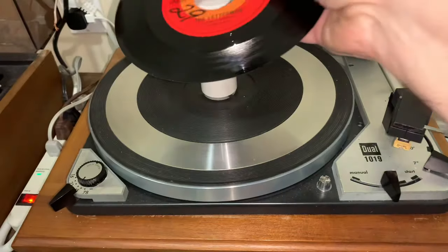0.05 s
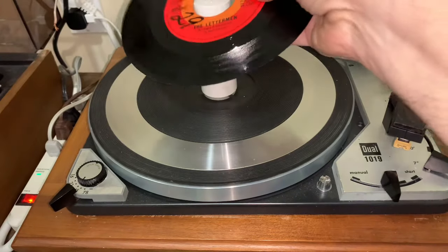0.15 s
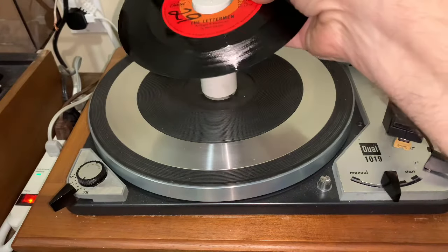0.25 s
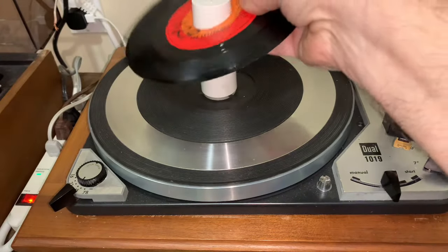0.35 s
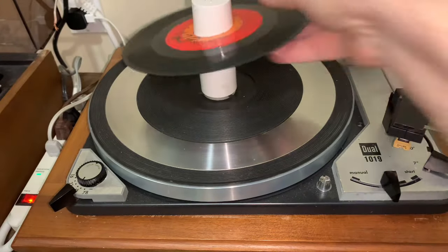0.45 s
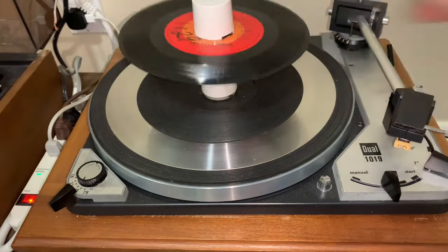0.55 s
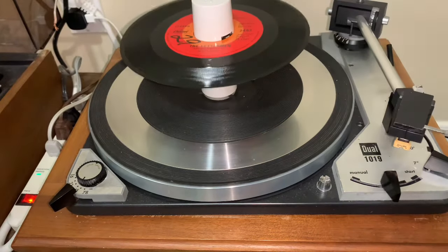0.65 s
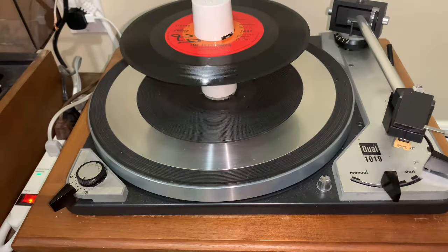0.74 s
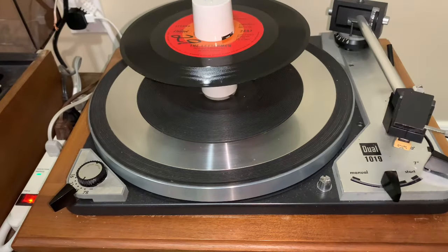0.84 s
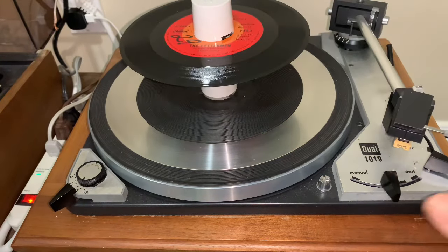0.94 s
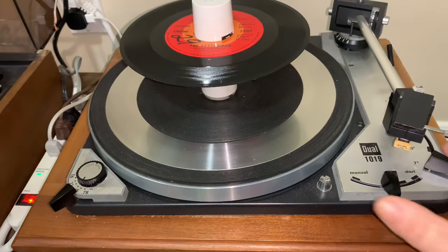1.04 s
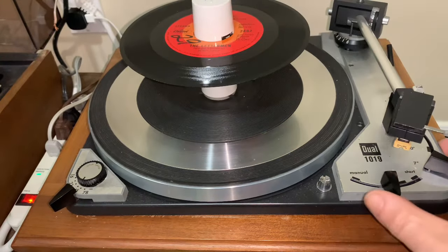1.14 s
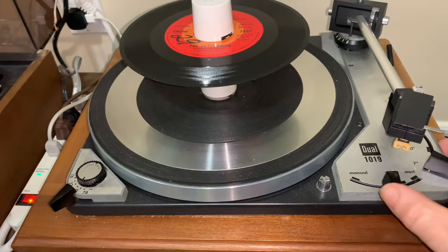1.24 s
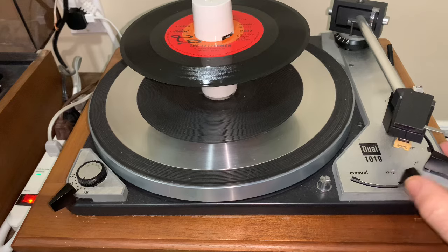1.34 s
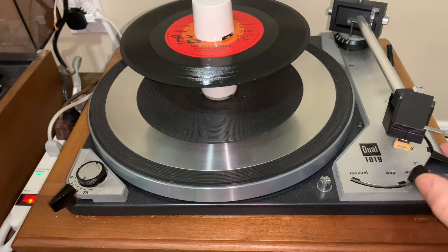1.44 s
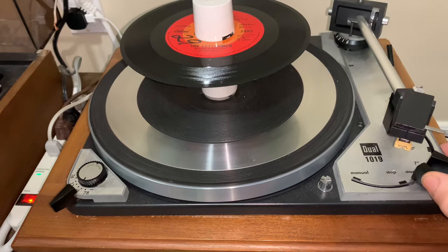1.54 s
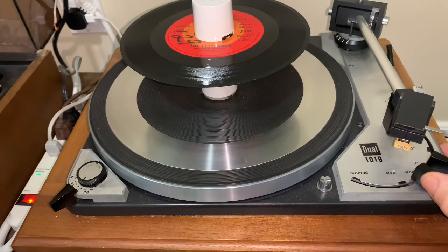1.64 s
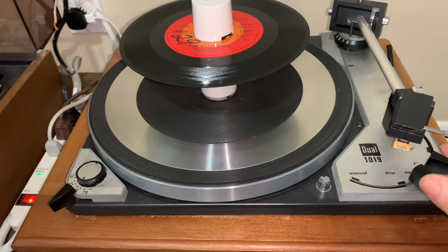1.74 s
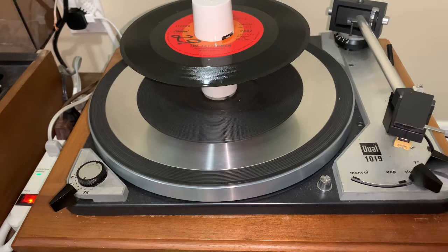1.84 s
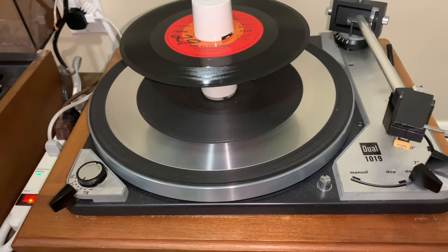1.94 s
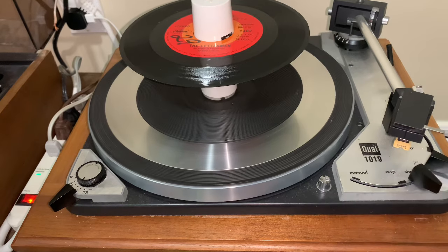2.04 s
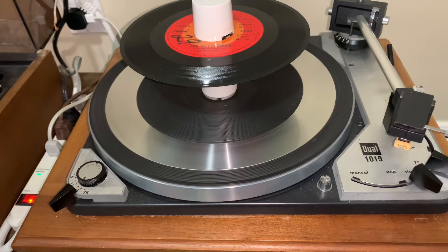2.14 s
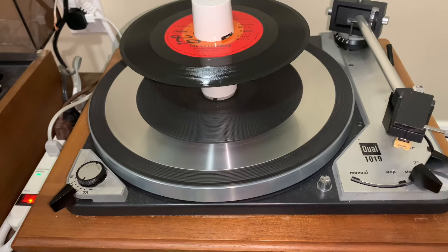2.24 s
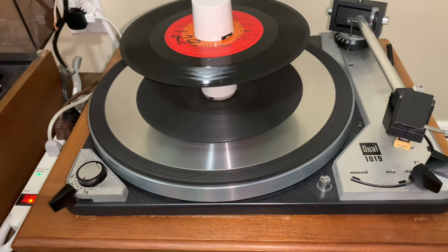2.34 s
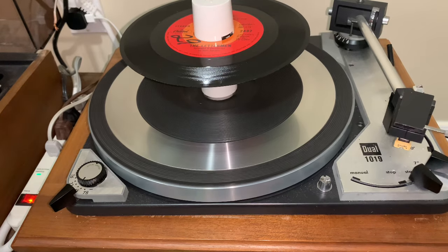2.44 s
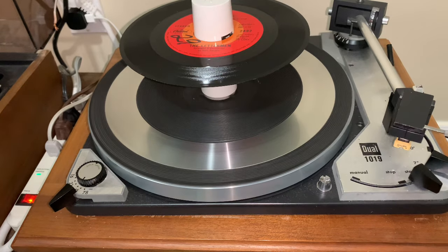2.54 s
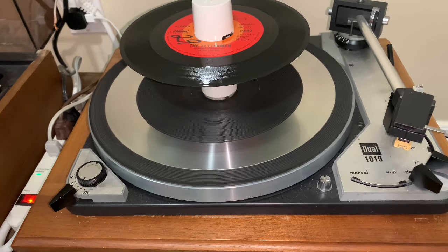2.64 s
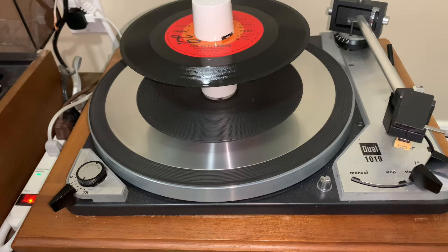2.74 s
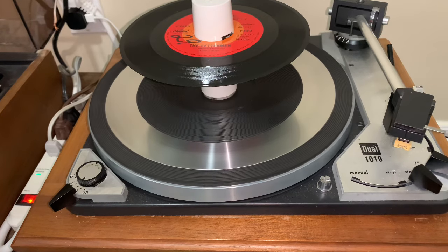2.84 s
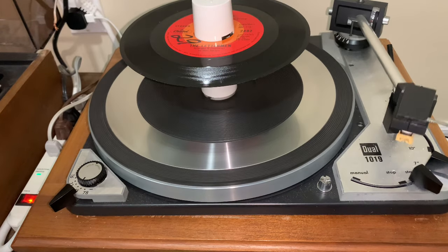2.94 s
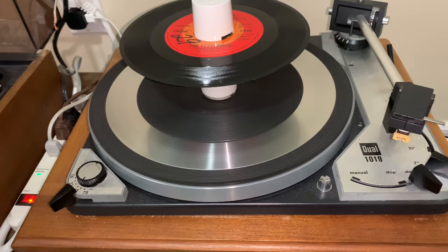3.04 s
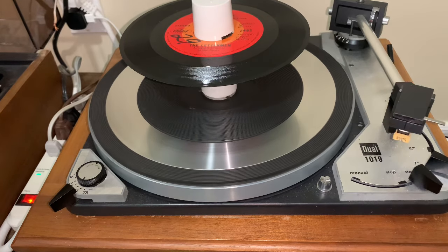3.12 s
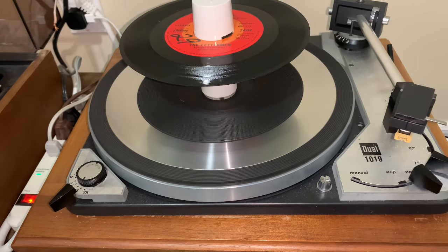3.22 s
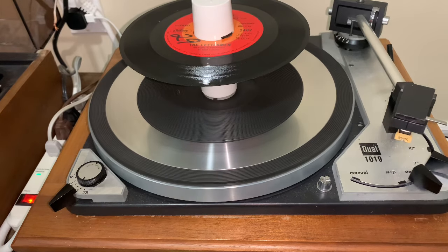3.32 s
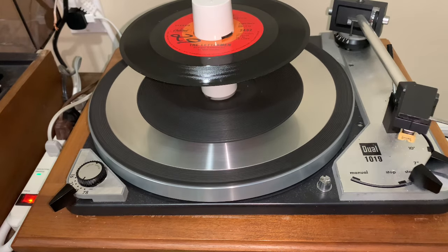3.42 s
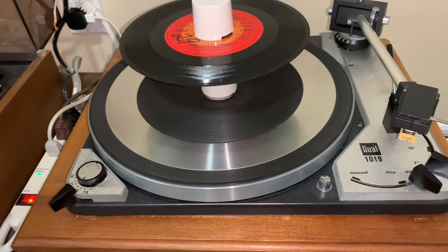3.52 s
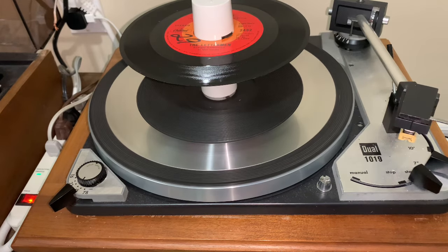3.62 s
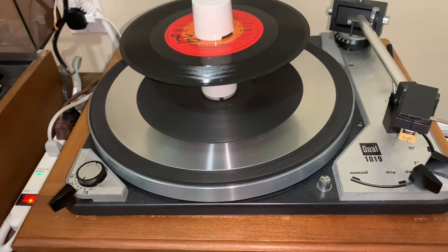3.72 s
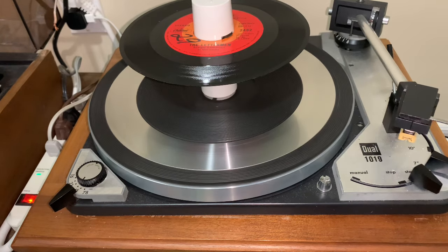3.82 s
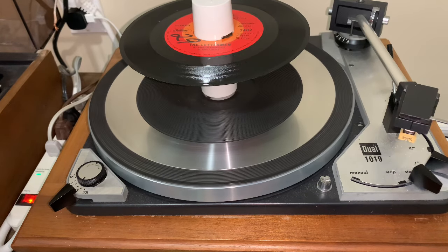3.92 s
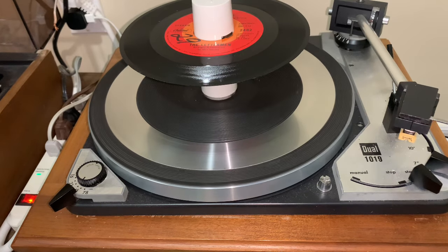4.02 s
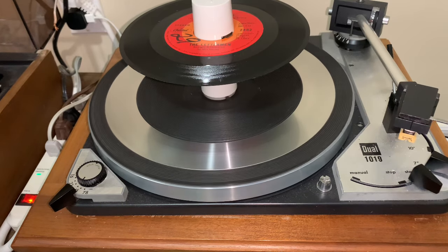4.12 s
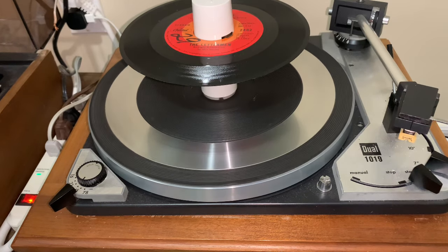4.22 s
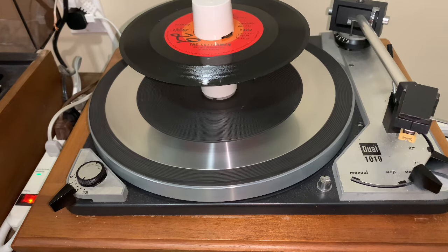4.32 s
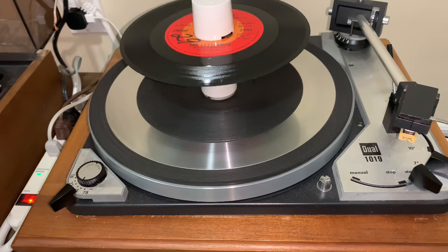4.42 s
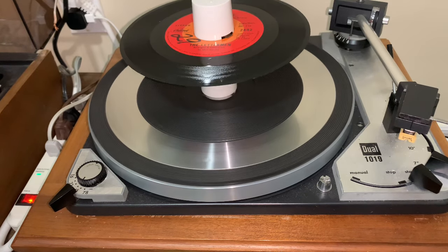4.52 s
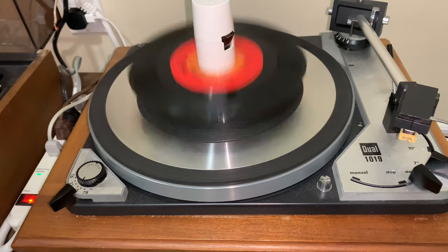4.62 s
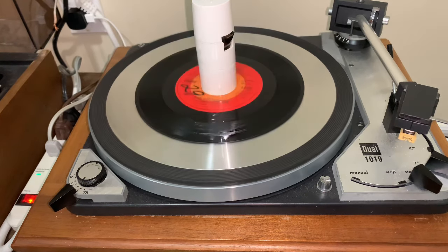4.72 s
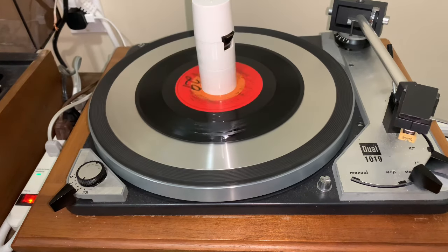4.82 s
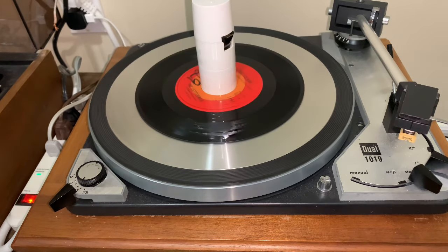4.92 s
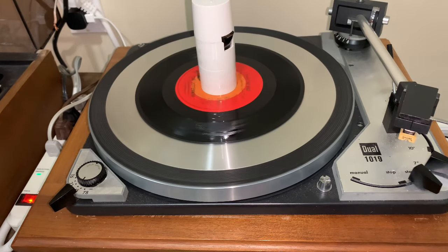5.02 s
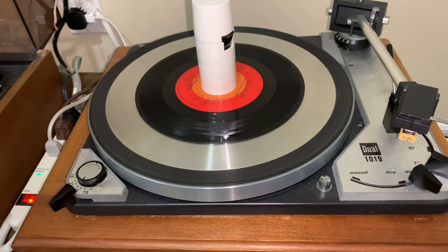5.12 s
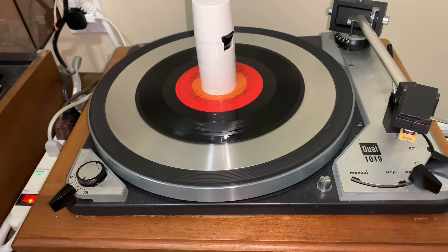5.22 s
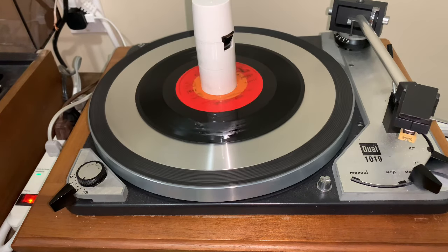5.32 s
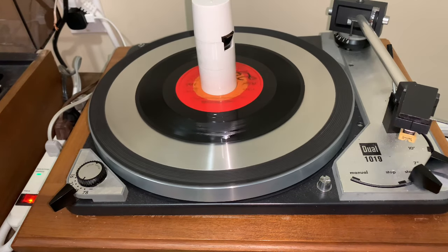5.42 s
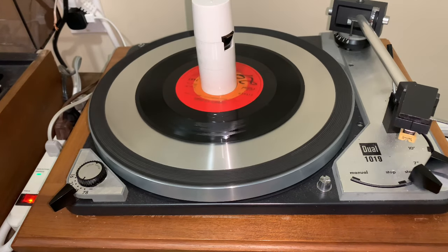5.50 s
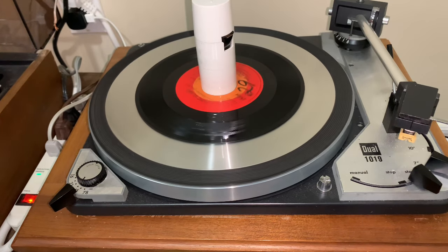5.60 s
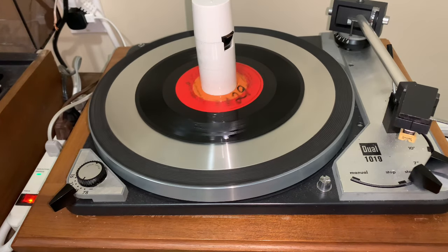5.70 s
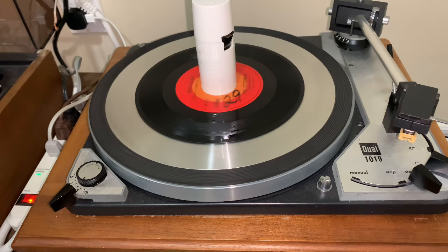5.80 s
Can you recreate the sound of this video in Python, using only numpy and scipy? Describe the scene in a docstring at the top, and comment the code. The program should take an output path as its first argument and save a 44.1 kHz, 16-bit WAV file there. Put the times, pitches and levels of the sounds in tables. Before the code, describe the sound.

Close stereo phone pickup in a small live room: a vinyl single scrapes and taps onto a wide spindle, then a start lever clacks hard twice with a lesser clack after. Faint irregular ticks and sliding follow, a long near-quiet, then a sharp click, a loud snap and the flat slap of the record landing with a soft thud. Low rumble and faint hiss throughout.

```python
"""Single dropped by a record changer

A vinyl single knocks its way onto the wide spindle of a record changer and the start lever is thrown.
The cam turns with faint ticks, sliding and rasping; the claws snap in, the single slides off and slaps down.
Blows are bursts of noise ringing part resonances, slides are swelling noise, pings and thud are damped sines.
A phone close by hears it in a small live room, over a low rumble with two drones and a faint hiss."""
import sys
import numpy as np
from scipy import signal
from scipy.fft import rfft, irfft, next_fast_len
from scipy.io import wavfile

SR = 44100
rng = np.random.default_rng(int(sys.argv[2]) if len(sys.argv) > 2 else 0)


def log_audio(samples):
    """Write samples as a 16-bit WAV file to the path given in sys.argv[1]."""
    # one column per channel
    frames = np.atleast_2d(samples).T
    # limit to full scale, then quantise
    limited = np.clip(frames, -1, 1)
    pcm = np.round(limited * 32767).astype(np.int16)
    wavfile.write(sys.argv[1], SR, pcm)


N = 258413
TIME = np.arange(N) / SR
RING = TIME[:SR // 3]  # seconds since a blow, as long as one may ring

# Blows: [start_s, level_db over 10 ms, chatter_ms, bass_db, presence_db, treble_db]
# the single knocking on the spindle
KNOCKS = [(.155, -42, 1.63, 18, 0, -5.5), (.187, -41, 1.66, 19, -2.5, -8.5),
          (.274, -46.5, 9.7, 18, -11.5, -7), (.301, -46, 8, 10.5, -16.5, -8),
          (.349, -47, 1.37, -11, -12, -1.5), (.467, -43.5, 5.8, 11.5, 3, 5),
          (.529, -36, 2.6, -4.5, -5, -2.5), (.575, -46.5, 3.7, 12.5, -7, -7.5),
          (.589, -35, 4.24, 6.5, 3, 1), (.619, -45.5, 2.84, -6, -13, -18)]
# pawls tripped by the turning cam
TICKS = [(2.3645, -41.5, 3.4, 14, 8, 5.5), (2.634, -51, 3.05, 17.5, -28.5, -31.5),
         (2.6755, -45.5, 2.46, -7.5, 6.5, 1.5), (2.761, -57, 2.1, -0.5, -19, -24),
         (2.936, -48.5, 5.44, -4.5, -1.5, -16.5), (4.146, -68, 4.11, -5.5, 6, 10),
         (4.265, -62.5, 4.96, -7, 7, -6.5), (4.328, -47, 9.9, -7.5, -5.5, -18.5),
         (4.9425, -38.5, 6.28, -5.5, -5.5, -5.5), (5.623, -63, 2.88, -6.5, -8, -4.5),
         (5.795, -49, 7.3, -1, -40, -37.5)]
# the claws taking the weight of the single
CATCHES = [(4.3542, -27, 0.97, 0.5, 3.5, 8), (4.3595, -28.5, 3.1, -4, -1.5, -4.5)]
# the claws snapping into the spindle, then the single sliding off it
SNAPS = [(4.540, -48.5, 6.7, -5, 9, -15.5), (4.549, -40.5, 7.4, -7, 15.5, -11.5),
         (4.555, -24.5, 8.65, 5.5, -3.5, 3), (4.5592, -17.5, 2.43, 2.5, 3, 1.5),
         (4.569, -29.5, 7.6, 13, -5, -19), (4.660, -39, 5.2, -6.5, 19.5, -16.5)]
# the single landing flat on the platter
SLAPS = [(4.6712, -28.5, 1.11, 4, 3.5, 4), (4.6762, -27.5, 3.5, -8, 11.5, -12.5),
         (4.6785, -23, 0.346, 7, 1.5, 5.5), (4.684, -33, 0.87, 1, -0.5, 2.5),
         (4.6895, -28.5, 2.6, -14.5, -2, -10.5), (4.6945, -32.5, 3.6, -11.5, 0, -4.5),
         (4.703, -51.5, 3.3, -2.5, -16, 4.5)]
# throws of the start lever and its linkage: the blow columns, then [rebound_after_ms, rebound_db]
LEVER_THROWS = [(1.218, -44, 7.8, -8, -4.5, -5, 9, -10), (1.304, -37.5, 6.1, -11.5, -2.5, -1.5, 20, -1.5),
                (1.354, -14.5, 6.12, 2, 0.5, 5.5, 26, -13), (1.465, -19.5, 6.5, 6, 2.5, 6, 12, -3),
                (1.7495, -31.5, 2.86, 8, -5.5, -6.5, 14, -15.5)]

# single notes left ringing by small parts and by the single itself:
# [start_s, pitch_hz, level_db over 10 ms, t60_s]
PINGS = [(.303, 356, -45, 0.057), (1.798, 338.1, -51.5, 0.141), (1.802, 268.5, -50.5, 0.152),
         (2.635, 1311, -55, 0.0545), (2.762, 1050, -62, 0.052), (2.941, 368.6, -56, 0.33),
         (3.382, 1315, -61.5, 0.187), (3.654, 1308, -58, 0.226), (4.356, 378, -43.5, 0.08),
         (4.944, 2145, -61, 0.53)]
# low modes of platter and deck: [pitch_hz, relative_level_db, t60_s]
PLATTER_MODES = [(62, -13, 0.21), (85.2, 0.5, 0.094), (120.8, -1, 0.082), (186.5, 4.5, 0.077),
                 (280, -4, 0.067), (333.6, 1.5, 0.12), (407, -3.5, .08)]

# Resonances of each part: [centre_hz, width_hz, lift_db]
# the single held on the spindle
VINYL_RESONANCES = [(361.6, 98, 3.5), (426.7, 28, 4.5), (482.15, 22, 4.5), (683.7, 50, 14.5),
                    (759, 130, 8.5), (1223, 54, 8), (1296, 170, 6.5), (2580, 220, 10.5), (4526, 180, 5.5),
                    (6617, 570, 6), (9065, 450, 14)]
# the changer's metalwork
CHASSIS_RESONANCES = [(398, 58, 3.7), (392, 42, 9.3), (681.5, 40, 14), (776.5, 41, 12), (1049.5, 70, 8),
                      (1143.1, 140, 6), (1660.4, 110, 8.4), (2047, 170, 5.6), (2384, 120, 5),
                      (2690, 160, 3.3), (3152, 46, 5.8), (3448, 46, 6.1), (3634, 110, 5.5), (5205, 34, 5.2),
                      (6096, 120, 4.4), (9200, 770, 6.8), (11030, 120, 7.3), (14950, 200, 8)]
# the spindle as the claws snap in and the single slides off
SPINDLE_RESONANCES = [(408, 45, 7), (500, 60, 4), (691, 55, 19), (787, 46, 11), (1167, 76, 16),
                      (1277, 90, 7.35), (1684, 190, 17), (2310, 160, 7), (2500, 100, 10), (3450, 250, 6),
                      (3977, 100, 9), (4526, 200, 10), (6510, 220, 8)]
# the claws under load
CLAW_RESONANCES = [(409, 76, 15), (694, 83, 7.5), (1120, 150, 5.5), (1340, 120, 4.5), (1770, 560, 5),
                   (5200, 370, 4.5), (6430, 330, 3), (8870, 910, 12)]
# the single as it lands
LANDING_RESONANCES = [(368, 67, 5), (420, 70, 5.6), (530, 110, 6.4), (734, 30, 4), (884, 65, 10),
                      (1200, 64, 4.4), (2037, 60, 6.7), (2127, 52, 6), (2346, 110, 3.87), (3950, 260, 4.6)]

# Broad colours, as spectral density: [frequency_hz, density_db]
# vinyl against the spindle and claws
VINYL_COLOUR = [(60, -17), (200, 1.5), (400, -0.5), (600, -5), (1300, 3), (2000, -9.5), (3500, -13),
                (6500, -5.5), (11000, -9.5), (16000, -24.5)]
# metal on metal in the lever and cam work
METAL_COLOUR = [(60, -34), (200, -18), (400, -7.5), (700, -2), (1500, 5), (3000, 5), (4500, 4), (6500, 5),
                (10000, 1.5), (13000, -7), (16000, -16.5)]
# the spindle as the claws snap in and the single slides off
SPINDLE_COLOUR = [(60, -42.5), (250, -25.5), (700, -2), (1300, -2), (2400, -1.5), (3200, -0.5),
                  (4300, -1.5), (7000, -5.5), (10500, 0.5), (13000, -12), (16000, -19)]
# the flat slap of the single
SLAP_COLOUR = [(60, -11.5), (400, 1), (650, -4), (1100, 3.5), (1600, -0.5), (2200, 3), (3000, -8.5),
               (4200, -2.5), (7000, -2), (10500, -0.5), (16000, -14.5)]
# the coarse part of dry sliding
SLIDE_COLOUR = [(150, 9.5), (400, -3), (1300, 3.5), (2300, -1), (4500, 1.5), (7000, -7), (9000, -12.5),
                (16000, -43.5)]
# the cam follower in its groove
RASP_COLOUR = [(200, -19), (450, -4), (1000, 2), (1400, 4.5), (2000, -8.5), (4000, -28.5)]
# the household rumble
RUMBLE_COLOUR = [(20, -37), (40, -12.5), (62, 3.5), (85, 1), (140, -2), (200, -8), (280, -17), (400, -23),
                 (800, -52.5), (2000, -60.5)]
# the background hiss
HISS_COLOUR = [(100, 11), (400, 10.5), (700, 7.5), (1200, 3.5), (2500, -1.5), (5000, -4.5), (7000, -6.5),
               (8500, -6), (11000, -4.5), (13500, -12), (16000, -9.5)]
# the fine-grained part of dry sliding
FINE_SLIDE_COLOUR = [(1000, -52.5), (7000, 3.5), (10000, 4), (12500, -2), (16000, -14)]
# the landing thud: little of it reaches below 40 Hz
THUD_COLOUR = [(20, -27), (40, -10), (60, 1.5), (500, -2.5), (1500, -4.0)]
# the room's late tail
TAIL_COLOUR = [(100, -5.5), (500, 9), (1500, 3.5), (4000, 5.5), (7000, -3.0), (10000, -10.5), (16000, -13.5)]

# Sliding strokes
# the single on the spindle: [peak_s, level_db before gain, rise_s, fall_s, fine_part_db against the coarse]
FITTING_STROKES = [(.04, -65, 0.15, .06, -12.5), (.28, -63, 0.103, .08, -21.5), (.37, -65.5, 0.06, .09, 3),
                   (.46, -59, .07, .1, -6), (.58, -62, 0.096, .07, -23)]
# the cam, same columns: [peak_s, level_db before gain, rise_s, fall_s, fine_part_db against the coarse]
CAM_STROKES = [(2.28, -62, 0.0746, 0.123, -10), (2.41, -57, 0.068, 0.066, -14),
               (2.62, -71, 0.263, 0.271, -14), (2.98, -67.5, 0.196, 0.272, -3.5),
               (3.3, -62.5, 0.179, .28, -6.5), (4.28, -74, 0.142, .1, -14.5)]
# the cam follower rasping in its groove: [peak_s, level_db, rise_s, fall_s]
RASP_STROKES = [(2.507, -63.5, 0.183, 0.4)]

# Room and background
# decay of the late tail: [frequency_hz, t60_s]
ROOM_T60 = [(100, 1.7), (350, 0.5), (800, 0.5316), (2000, 0.6774), (3800, 0.57), (5500, 0.5136),
            (8000, 0.6176), (11000, 0.24), (16000, 0.0147)]
# the rumble's slow swell: [time_s, level_db before trim and surge]
RUMBLE_SWELL = [(0.0, -65), (0.75, -55.5), (1.05, -65), (1.4, -56), (2.1, -63.5), (3.3, -62), (3.75, -68),
                (5.0, -64.5), (5.86, -69)]
# wavering drones: [pitch_hz, width_hz, level_db before surge]
DRONES = [(116.6, 19, -63.5), (178.25, 7, -69.5)]

# Phone ports
# phase by which the left port leads the right: [frequency_hz, lead_rad]
PORT_PHASE = [(0, 0), (6600, 0), (7750, -2.3), (8700, -3.14), (9500, -4.3), (10400, -6), (11600, -6.6),
              (12700, -9), (14000, -9.9), (15200, -12.4), (16500, -12.8)]
# how much louder the left port hears than the right: [frequency_hz, balance_db]
PORT_BALANCE = [(100, 0), (1000, 1), (2000, 0.5), (4000, -1), (7000, -2.5), (10000, 0)]
# gain of the difference between the ports: [frequency_hz, gain_db]
PORT_SIDE = [(100, -6.5), (330, -9.5), (600, -2), (1200, -2.5), (2200, -1.0),
             (6500, -0.5), (8200, -19.0), (16000, -11)]
# gain of what the ports share: [frequency_hz, gain_db]
PORT_MID = [(6500, -1), (8200, -1.0), (16000, 3.5)]


def undb(db):
    """Decibels to gain."""
    return 10 ** (np.asarray(db) / 20)


def unit(x):
    """Scale to an energy of one per channel, on average."""
    return x / np.sqrt(np.mean(np.sum(x ** 2, axis=-1)))


def along(points, hz):
    """Read (Hz, value) points on a log-frequency axis."""
    f, value = np.transpose(points)
    return np.interp(np.log(hz + 1e-9), np.log(f), value)


def response_db(hz, points, resonances):
    """A broad (Hz, dB) colour, lifted at each resonance."""
    lifts = sum(lift / (1 + (2 * (hz - f) / width) ** 2) for f, width, lift in resonances)
    return along(points, hz) + lifts


def colour(x, points, resonances=()):
    """Causal minimum-phase filter: its resonances ring on after each blow."""
    size = next_fast_len(x.shape[-1] + SR // 10, True)
    gain = undb(response_db(np.fft.rfftfreq(size, 1 / SR), points, resonances))
    # folding the cepstrum forward in time makes the filter causal
    cepstrum = irfft(np.log(gain), size)
    cepstrum[1:size // 2] *= 2
    cepstrum[size // 2 + 1:] = 0
    response = np.exp(rfft(cepstrum))
    return irfft(rfft(x, size) * response, size)[..., :x.shape[-1]]


def pair(size, width):
    """Left and right noise; width is the side's size against the mid."""
    mid, side = rng.standard_normal((2, size))
    return np.array([mid + width * side, mid - width * side])


def noise(points, width, resonances=()):
    """Steady coloured stereo noise of rms one."""
    size = next_fast_len(N, True)
    gain = undb(response_db(np.fft.rfftfreq(size, 1 / SR), points, resonances))
    coloured = irfft(rfft(pair(size, width)) * gain)[:, :N]
    return unit(coloured) * np.sqrt(N)


def walk(rate):
    """A random wander with a spread near one, drawn through `rate` random points a second."""
    knots = rng.standard_normal(int(TIME[-1] * rate) + 2)
    return np.interp(TIME * rate, np.arange(len(knots)), knots)


def add(out, start_s, level_db, sound):
    """Place a sound, its energy given as a level over 10 ms."""
    start = int(start_s * SR)
    part = unit(sound)[:, :N - start]
    out[:, start:start + part.shape[1]] += undb(level_db) * np.sqrt(SR / 100) * part


def ring(modes, spread):
    """Damped modes; each reaches the two ports with its own phase, more so when high."""
    out = 0
    for hz, db, t60 in modes:
        phase = spread * min(hz / 2000, 1) * rng.standard_normal((2, 1))
        tone = np.sin(2 * np.pi * hz * RING + phase) * undb(-60 * RING / t60)
        out = out + undb(db) * unit(tone)
    return unit(out)


def blows(rows, spectrum, resonances, body_db, body_t60, width):
    """Each blow is chattering contact plus a short wash of dense modes, shaped by the part's resonances."""
    out = np.zeros((2, N))
    fade = undb(-60 * RING / body_t60)
    for start_s, level_db, chatter_ms, bass_db, presence_db, treble_db in rows:
        age = np.minimum(RING * 1000 / max(chatter_ms, .2), 30)  # in chatter times
        contact = unit(pair(len(RING), width) * np.sqrt(age) * np.exp(-1.3 * age))
        body = unit(pair(len(RING), width) * fade * (1 - np.exp(-age)))
        sound = colour(contact + undb(body_db) * body, spectrum, resonances)
        # soft contacts thump, hard ones click
        hardness = [(300, bass_db), (900, 0), (1800, 0),
                    (4500, presence_db), (7000, presence_db), (10500, treble_db)]
        add(out, start_s, level_db, colour(sound, hardness))
    return out


def grazed(rows, graze_db):
    """A moving part scrapes its stop just before it strikes; graze_db is against the strike."""
    lead_ms, chatter_ms = 8, 14
    grazes = [(start_s - lead_ms / 1000, level_db + graze_db, chatter_ms, *tone)
              for start_s, level_db, _, *tone in rows]
    return rows + grazes


def throws(rows, graze_db):
    """Each throw of a lever is three contacts: a graze, the strike and a duller rebound."""
    duller_bass_db, duller_treble_db = 8.5, -3.5
    strikes = [row[:6] for row in rows]
    rebounds = [(start_s + after_ms / 1000, level_db + rebound_db, chatter_ms,
                 bass_db + duller_bass_db, presence_db, treble_db + duller_treble_db)
                for start_s, level_db, chatter_ms, bass_db, presence_db, treble_db, after_ms, rebound_db in rows]
    return grazed(strikes, graze_db) + rebounds


def stroke(peak_s, level_db, rise_s, fall_s):
    """Gain of a sliding contact that speeds up to a peak and slows to rest."""
    drop_db = 19.5  # how far down the stroke is at the ends of its rise and fall
    shape = 1.9  # 1 = pointed, 2 = rounded
    away = np.maximum((peak_s - TIME) / rise_s, (TIME - peak_s) / fall_s)
    return undb(level_db - drop_db * away ** shape)


def slide(rows, resonances, gain_db, grain_db, lump_db):
    """Dry surfaces sliding: hiss roughened by fast grain and by slower lumps of catch and slip."""
    coarse = noise(SLIDE_COLOUR, 0.944, resonances)
    fine = noise(FINE_SLIDE_COLOUR, width=1.0)
    hiss = sum(stroke(peak_s, level_db, rise_s, fall_s) * (coarse + undb(fine_db) * fine)
               for peak_s, level_db, rise_s, fall_s, fine_db in rows)
    return hiss * undb(gain_db + grain_db * walk(300) + lump_db * walk(39))


def background():
    """Low household rumble that surges unevenly, with two wavering drones, under a faint steady hiss."""
    rumble_trim_db, surge_db, hiss_db = 2.5, 2.08, -75.5
    swell_db = np.interp(TIME, *np.transpose(RUMBLE_SWELL))
    low = noise(RUMBLE_COLOUR, width=0.8) * undb(swell_db + rumble_trim_db)
    for pitch_hz, width_hz, level_db in DRONES:
        # a complex wander in level and phase broadens the tone
        waver = walk(2 * width_hz) + 1j * walk(2 * width_hz)
        low = low + undb(level_db) * np.real(waver * np.exp(2j * np.pi * pitch_hz * TIME))
    return low * undb(surge_db * walk(14)) + undb(hiss_db) * noise(HISS_COLOUR, width=1.0)


def fitting():
    """The single slides on the spindle, its vinyl resonating as the friction catches in lumps."""
    return slide(FITTING_STROKES, VINYL_RESONANCES, gain_db=1.5, grain_db=4.0, lump_db=2.2)


def knocks():
    """The single knocks on the spindle, each knock led by a graze."""
    contacts = grazed(KNOCKS, graze_db=-16)
    return blows(contacts, VINYL_COLOUR, VINYL_RESONANCES, body_db=-3, body_t60=.1, width=0.66)


def pings():
    """Small parts and the single itself are left ringing on single notes, each with a soft onset."""
    out = np.zeros((2, N))
    for start_s, pitch_hz, level_db, t60_s in PINGS:
        note = ring([(pitch_hz, 0, t60_s)], spread=0.47)
        add(out, start_s, level_db, note * (1 - np.exp(-RING / 0.0025)))
    return out


def lever():
    """The start lever and its linkage clack against their stops and rebound, ringing the chassis."""
    contacts = throws(LEVER_THROWS, graze_db=-13.5)
    return blows(contacts, METAL_COLOUR, CHASSIS_RESONANCES, body_db=-6.5, body_t60=0.13, width=0.8)


def cam():
    """The turning cam slides with a fine grain and no slower lumps."""
    return slide(CAM_STROKES, [], gain_db=1.0, grain_db=2.5, lump_db=0.0)


def ticks():
    """Pawls tripped by the cam graze and strike, ringing the chassis."""
    contacts = grazed(TICKS, graze_db=-13)
    return blows(contacts, METAL_COLOUR, CHASSIS_RESONANCES, body_db=-9, body_t60=0.14, width=0.72)


def rasp():
    """The cam follower drags in its groove in small uneven slips."""
    slips = undb(3.4 * walk(140))
    return noise(RASP_COLOUR, width=0.79) * sum(stroke(*row) for row in RASP_STROKES) * slips


def catches():
    """The claws take the weight of the single, with more short body than bare contact."""
    return blows(CATCHES, VINYL_COLOUR, CLAW_RESONANCES, body_db=1.5, body_t60=0.026, width=0.82)


def snaps():
    """The claws snap into the spindle, then the single slides off it; the spindle's resonances ring."""
    return blows(SNAPS, SPINDLE_COLOUR, SPINDLE_RESONANCES, body_db=-4.0, body_t60=.12, width=0.96)


def slaps():
    """The single lands flat in a quick run of contacts, nearly central between the ports."""
    return blows(SLAPS, SLAP_COLOUR, LANDING_RESONANCES, body_db=-5.0, body_t60=0.08, width=0.26)


def thud():
    """The landing pushes the platter and the sprung deck, setting off their damped low modes."""
    out = np.zeros((2, N))
    push = -ring(PLATTER_MODES, spread=0.97)  # the lowest modes swing downward first
    add(out, 4.679, -29.5, colour(push, THUD_COLOUR))
    return out


def skid():
    """The fallen single slips briefly until the mat carries it round: one short swish of noise."""
    peak_s, level_db, swish_hz, spread_s = 5.28, -65, 4190, 0.0443
    # the colour climbs to the swish and falls sharply just above it
    swish_colour = [(swish_hz / 4, -28), (swish_hz * 0.69, -12), (swish_hz * 1.0, -2),
                    (swish_hz * 1.145, 0), (swish_hz * 1.14, -13), (swish_hz * 3.14, -26)]
    swell = np.exp(-((TIME - peak_s) / spread_s) ** 2)
    return noise(swish_colour, width=0.57) * undb(level_db) * swell


def room(x, early_db, early_t60, late_db):
    """A quick wash off the cabinet and wall, then a diffuse tail whose top treble dies first."""
    t = TIME[:SR]
    hz = np.fft.rfftfreq(SR, 1 / SR)
    centres = np.geomspace(60, 16000, num=17)
    diffuse, tail = rfft(pair(SR, width=1.0)), 0
    # split the noise into overlapping bands, each with its own decay
    for centre_hz, share in zip(centres, np.eye(len(centres))):
        band = irfft(diffuse * np.interp(hz, centres, share), SR)
        tail = tail + band * undb(-60 * t / along(ROOM_T60, centre_hz))
    tail = colour(tail * (1 - np.exp(-t / 0.0025)), TAIL_COLOUR)
    early = pair(SR, width=1.0) * undb(-60 * t / early_t60) * (1 - np.exp(-t / 0.0026))
    response = undb(early_db) * unit(early) + undb(late_db) * unit(tail)
    return x + signal.fftconvolve(x, response, axes=1)[:, :N]


def scene():
    """Single, lever, cam and spindle in the room, over the background."""
    deck = fitting() + knocks() + lever() + cam() + ticks() + rasp()
    deck += catches() + snaps() + slaps() + thud() + skid()
    near = pings()  # the pings are close and hardly stir the room
    pings_into_room = undb(-14.0) * near
    in_room = room(deck + pings_into_room, early_db=-13, early_t60=0.26, late_db=-10.5)
    return in_room + near + background()


def record(dry):
    """The phone's two ports: more alike in bass and top treble, their phases turning apart up high."""
    hz = np.fft.rfftfreq(N, 1 / SR)
    left, right = rfft(dry)
    mid = (left + right) / 2 * undb(along(PORT_MID, hz))
    side = (left - right) / 2 * undb(along(PORT_SIDE, hz))
    # half of the phase and balance goes to each port, in opposite senses
    turn = np.exp(.5j * np.interp(hz, *np.transpose(PORT_PHASE)))
    turn = turn * undb(along(PORT_BALANCE, hz) / 2)
    ports = irfft(np.array([(mid + side) * turn, (mid - side) / turn]), N)
    top_hz = 16200  # steep low-pass
    return signal.sosfilt(signal.ellip(10, .2, 70, top_hz, fs=SR, output="sos"), ports)


dry = scene()
out = record(dry)
log_audio(out)
```